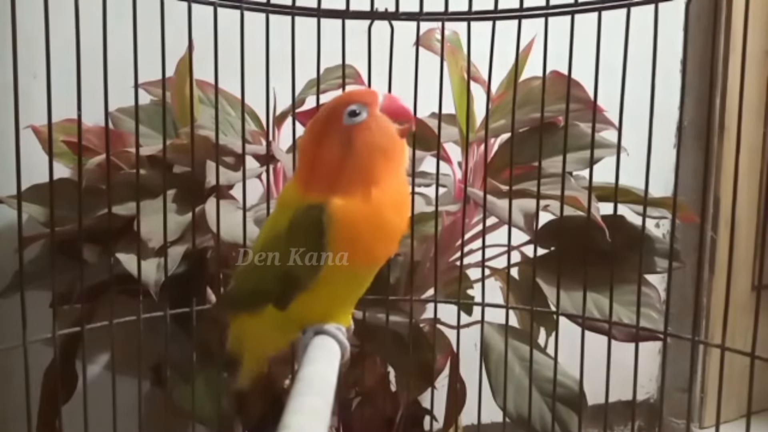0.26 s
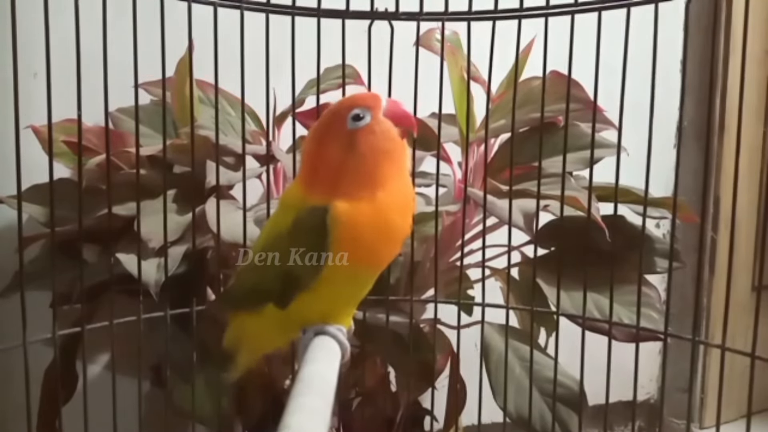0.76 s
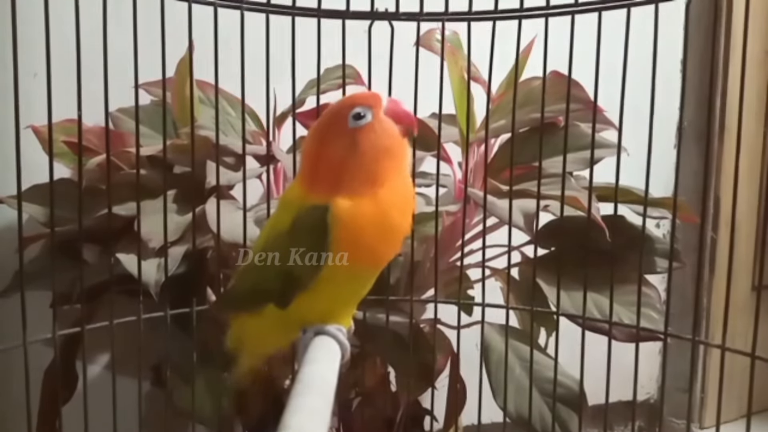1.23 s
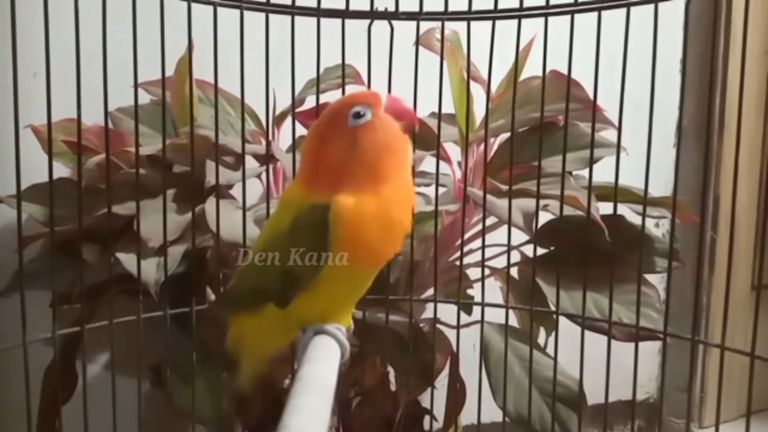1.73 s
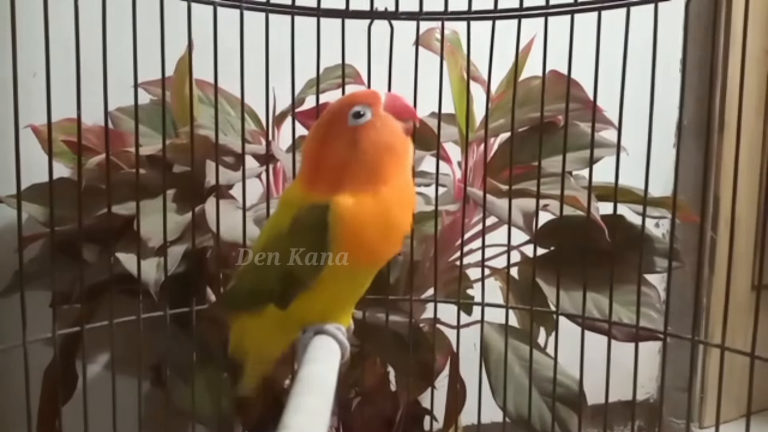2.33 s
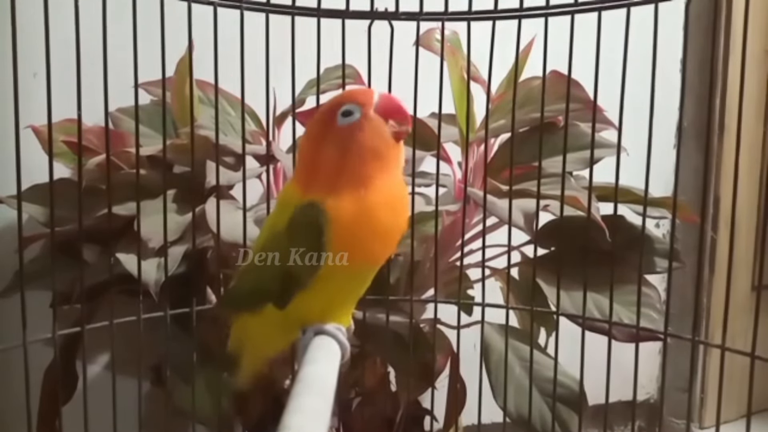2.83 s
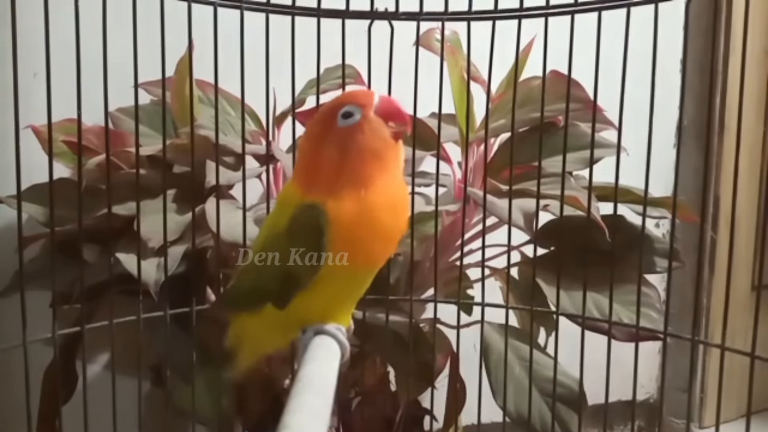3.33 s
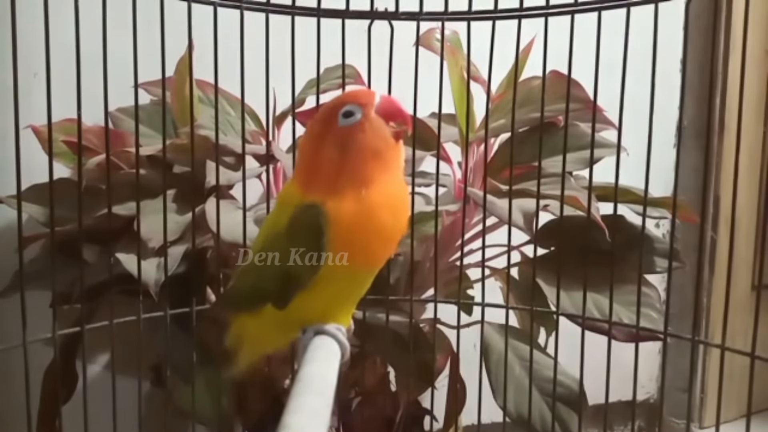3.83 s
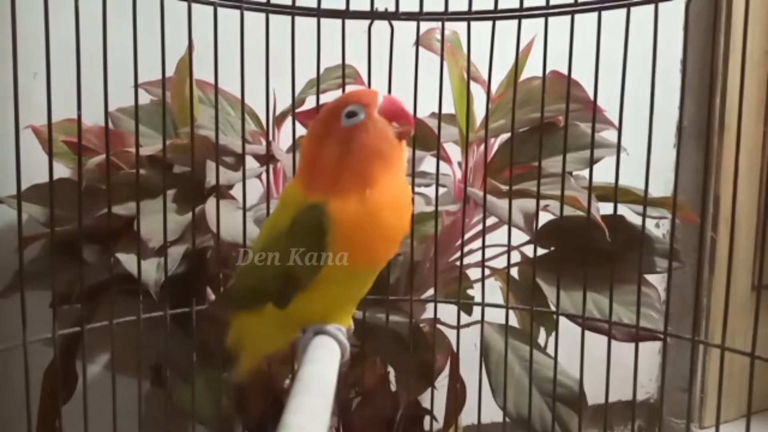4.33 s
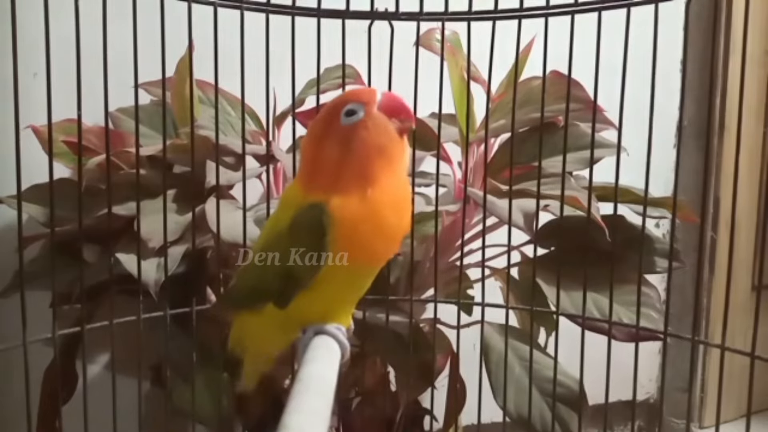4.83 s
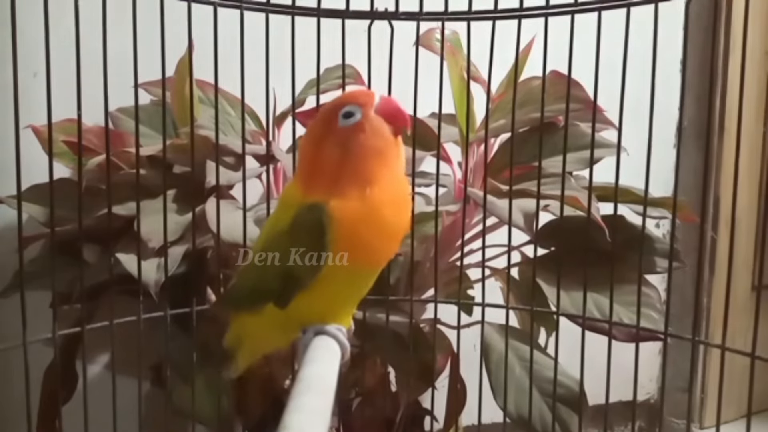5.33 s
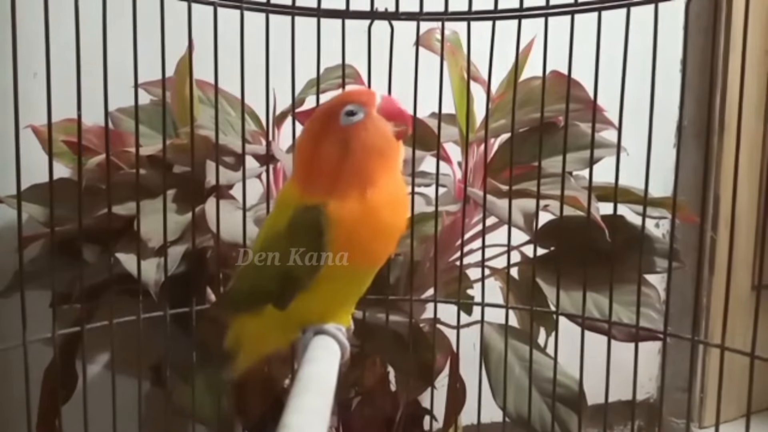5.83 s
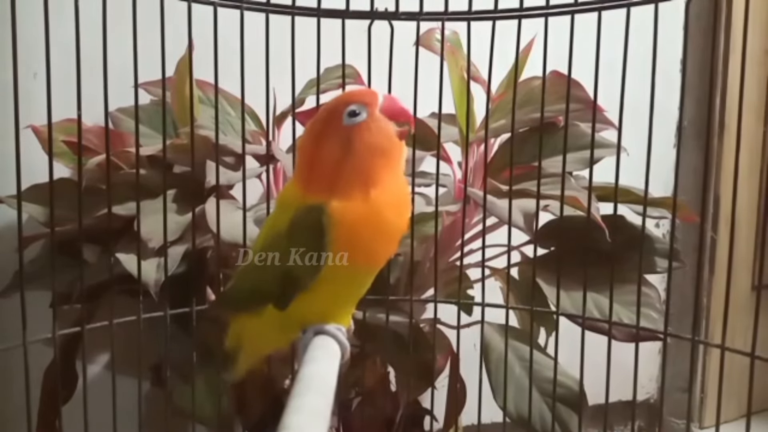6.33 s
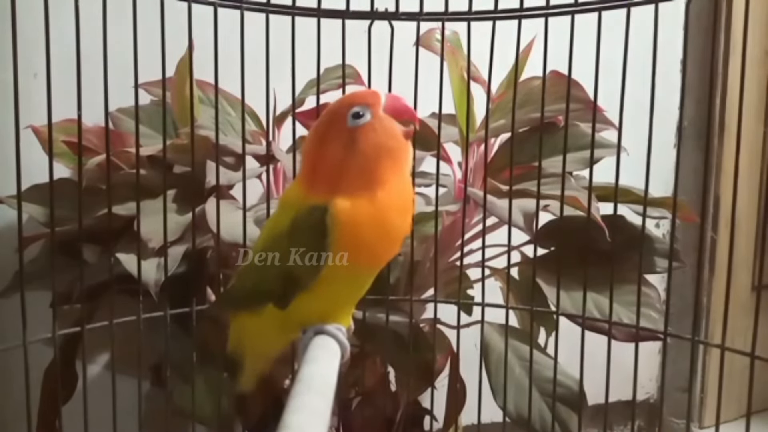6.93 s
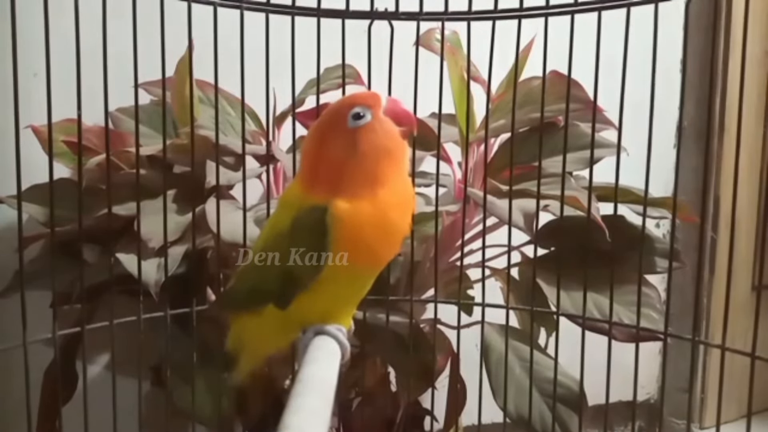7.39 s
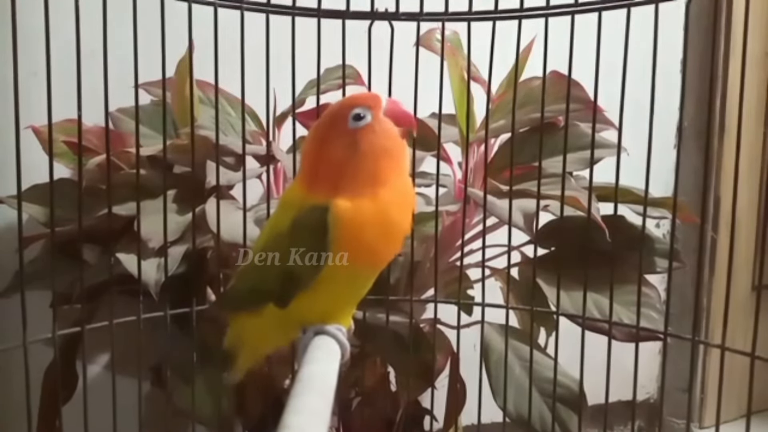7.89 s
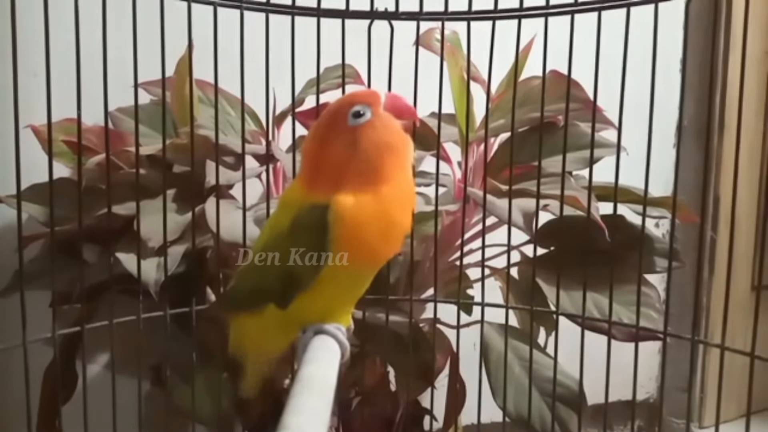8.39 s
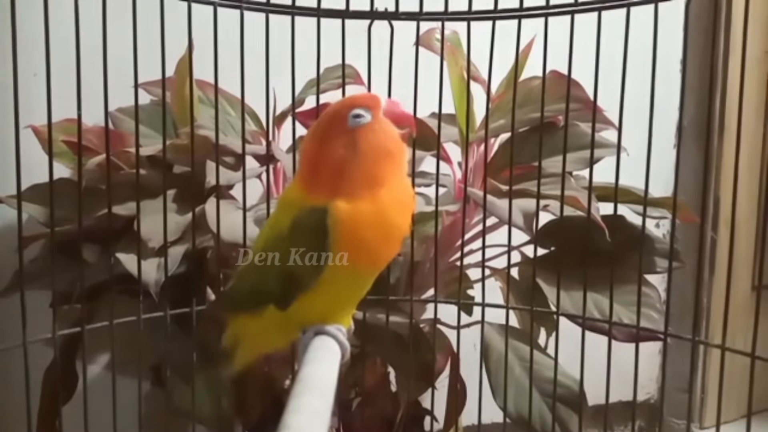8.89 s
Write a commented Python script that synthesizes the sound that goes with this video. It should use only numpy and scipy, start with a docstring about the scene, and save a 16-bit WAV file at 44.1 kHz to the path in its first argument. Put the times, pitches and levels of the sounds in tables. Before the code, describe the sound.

One lovebird calls close to the microphone in a small, hard, quiet room. Shrill chirps come evenly, about nine or ten a second, each with a quick upward flick and abrupt end. Dry chips thicken into fuller steps, then longer slurred chirps, before returning to chips; the cycle repeats. Bright echoes ring between them over faint air hush and low rumble.

```python
"""A caged lovebird chatters close by in a small, quiet room, about ten chirps each second.
Each chirp is a harmonic series on a gliding pitch, filtered by throat resonances: a lead-in, a sudden upward flick,
and a finish that settles and dies. The phrases pass from dry chips to drawn-out slurs; broadband noise rises and
falls with the chirps, and faint swept ticks precede them. Echoes and a decaying ring form the room's response.
Behind lie a faint wavering tone, filtered noise for still air, and a low rumble with soft thumps."""
import sys
import numpy as np
from scipy import signal
from scipy.fft import rfft, irfft
from scipy.io import wavfile
from scipy.ndimage import uniform_filter1d

SR = 44100
rng = np.random.default_rng(int(sys.argv[2]) if len(sys.argv) > 2 else 0)


def to_wav(sig):
    """Store sig (one row per channel, or 1-D mono) as 16-bit WAV at the path in sys.argv[1].

    Samples outside -1..1 are clipped; the rate is SR.
    """
    pcm = np.clip(np.atleast_2d(sig), -1, 1) * 32767
    pcm = np.round(pcm).astype(np.int16)
    wavfile.write(sys.argv[1], SR, pcm.T)  # frames by channels


N = 403515

# Lead-ins, each ending on top of the flick, before transposition and changes of effort:
# (share of the lead-in [0-1], pitch [Hz], relative level [dB], overtone tilt [dB per octave])
CHIP = [(0, 2332, -1.5, -1.5), (.3, 2615, -2.4, 6), (.53, 4082, -2, -0.5), (.8, 2695, -3, 5.5),
        (1, 4908, 1.5, -1.5)]
SOFT_CHIP = [(0, 2100, -6.5, 1.5), (.43, 2160, 0, 3.5), (.57, 3830, -5.5, -6.5), (.8, 2514, 0.5, -4),
             (1, 4440, -4.5, -14)]
STEP = [(0, 2510, -0.5, -4), (.4, 2580, -2, 2.5), (.75, 2815, -0.5, -6.5), (.9, 3060, -6.5, 6),
        (1, 5070, 1.5, -8.5)]
RISING_STEP = [(0, 2294, 5, 1.5), (.2, 2225, 1.5, -1), (.8, 2350, -2, 0.5), (1, 3740, 0, -2.5)]
LOW_STEP = [(0, 1537, -7, 1), (.42, 1960, 4.5, -2), (.9, 2030, -1, 4.5), (.96, 4300, -3, -6),
            (1, 4910, 8.5, -11.5)]
SCOOP = [(0, 1627, -14, -3), (.3, 1908, -2, -4), (.55, 2370, -4, -3), (.88, 2360, -5.5, 5.5),
         (1, 4730, 0, -12)]
ARCH = [(0, 1564, -10.5, 5.5), (.24, 1803, 0.5, -9.5), (.35, 3162, -6, -9.5), (.62, 3357, 1, -8),
        (.81, 3420, -1.5, -4), (.91, 2305, -1, -21.5), (1, 5170, -2.5, -26)]
FLAT_ARCH = [(0, 1533, -11, -1), (.24, 1680, -3.5, 0), (.35, 3297, -12.5, -2.5), (.79, 3510, -2, -4),
             (.88, 3690, -1, -21), (.92, 2510, -5.5, -7), (1, 3887, -4, 0)]
CLIMB = [(0, 1583, -9.5, 0), (.3, 1807, -3.5, -7.5), (.42, 3274, -7.5, -8), (.76, 3690, 2.5, -8.5),
         (.92, 4100, -7, -12), (1, 5360, -7.5, -10.5)]
FALL = [(0, 3975, -21, 3), (.24, 3634, 4, -5), (.5, 3046, -3.5, -1.5), (.75, 2660, 0.5, 3),
        (.94, 2160, -4.5, 7.5), (1, 4530, -3, -5)]
SQUEAK = [(0, 2580, 0.0035, 4.4), (1, 4140, 0, 1.3)]
# The bird's song, chirp by chirp:
# (start of the lead-in [s], gesture [name], lead-in [s], pitch factor [ratio], relative level [dB])
CHIRPS = [(.0058, "chip", .012, 0.98, -10.5), (.1077, "chip", 0.012, 0.96, -9.5),
          (0.2106, "chip", .0133, .98, -10), (0.311, "soft chip", .0135, .99, -9.5),
          (0.4167, "soft chip", 0.014, .965, -9), (0.5221, "soft chip", 0.011, 0.96, -8.5),
          (0.628, "soft chip", 0.014, 0.98, -9.5), (0.7342, "step", 0.01, 0.96, -10),
          (0.843, "step", 0.013, 0.99, -10), (0.957, "step", 0.013, 0.99, -9.5),
          (1.0707, "step", 0.014, 0.97, -9), (1.1857, "step", 0.016, 0.95, -8.5),
          (1.3019, "step", 0.018, 0.96, -8), (1.4175, "step", 0.018, 0.97, -6),
          (1.5394, "rising step", 0.02, 1.02, -8.5), (1.6537, "low step", 0.04, 0.97, -11),
          (1.773, "flat arch", 0.04, 1.016, -8), (1.8872, "arch", 0.036, 1.01, -10),
          (1.9979, "arch", .037, 1.007, -8.5), (2.1127, "arch", 0.039, 1, -9),
          (2.2287, "arch", 0.037, 0.99, -9), (2.3438, "arch", 0.039, 1.01, -10),
          (2.4602, "arch", 0.037, 1.013, -10), (2.594, "chip", 0.013, 0.88, -13),
          (2.6919, "chip", 0.011, 0.97, -10.5), (2.791, "chip", 0.011, 0.99, -10.5),
          (2.8945, "chip", 0.0094, .95, -11), (2.9951, "chip", 0.0096, 0.96, -12),
          (3.0412, "chip", 0.013, 1, -13.5), (3.098, "squeak", 0.0044, 0.77, -22.5),
          (3.1381, "chip", 0.011, 1.015, -11), (3.2373, "chip", 0.0097, .99, -10.5),
          (3.3351, "chip", 0.011, 0.98, -11), (3.4353, "chip", 0.0089, 0.97, -11),
          (3.5331, "chip", 0.0092, 1.005, -10), (3.6323, "chip", 0.01, 0.98, -11),
          (3.7349, "chip", 0.011, 0.98, -10.5), (3.8336, "chip", 0.01, 0.98, -10.5),
          (3.9296, "chip", 0.014, 0.98, -8.5), (4.0314, "chip", 0.013, 0.98, -9.5),
          (4.1302, "chip", .01, .98, -8.5), (4.2305, "chip", 0.012, 1.01, -9.5),
          (4.3356, "chip", 0.011, 0.98, -10), (4.4375, "chip", 0.011, .98, -9.5),
          (4.5395, "chip", 0.012, 0.95, -10), (4.6301, "fall", 0.038, 1.04, -11.5),
          (4.7385, "fall", 0.041, .99, -11.5), (4.8537, "scoop", .0306, 1.01, -9.5),
          (4.9639, "flat arch", 0.036, 1.005, -8), (5.0747, "climb", 0.039, .935, -10),
          (5.1886, "climb", 0.036, 1.023, -8), (5.2996, "climb", 0.03, 1.03, -8.5),
          (5.4064, "climb", 0.033, 1.026, -7.5), (5.5155, "climb", 0.035, 1.02, -9),
          (5.634, "chip", 0.012, 0.98, -11), (5.733, "chip", 0.012, 0.97, -10),
          (5.8315, "chip", 0.011, 0.99, -9.5), (5.9303, "chip", 0.013, 0.99, -11.5),
          (6.0314, "chip", 0.01, .965, -11.5), (6.1337, "chip", 0.011, 0.99, -10.5)]
SONG_S = 6.23093  # the song starts over after this time
ROUNDS = (0, SONG_S)  # starts of the two rounds [s]


def gain_of(db):
    """Logarithmic level: converts decibels to an amplitude ratio."""
    return 10 ** (np.asarray(db) / 20)


def evened(x):
    """Power normalization: scales a signal to an rms of 1."""
    return x / np.sqrt(np.mean(x ** 2) + 1e-20)


def read(points, hz, axis=1):
    """Spectral envelope: interpolates one column of a table along log frequency."""
    columns = np.transpose(points)
    return np.interp(np.log(hz + 1), np.log(columns[0] + 1), columns[axis])


def add(mix, s, sound):
    """Superposition: adds a sound into the mix, in place, from time s."""
    part = mix[max(round(s * SR), 0):][:len(sound)]
    part += sound[:len(part)]


def noise(spectrum):
    """Linear filtering: white noise is coloured by a spectral envelope."""
    white = rfft(rng.standard_normal(N))
    hz = np.fft.rfftfreq(N, 1 / SR)
    return irfft(white * gain_of(read(spectrum, hz)), N)


def waver(size, hz):
    """Random modulation: noise of rms 1 under a Gaussian low-pass, down to 1/e at hz."""
    white = rfft(rng.standard_normal(size))
    lowpass = np.exp(-(np.fft.rfftfreq(size, 1 / SR) / hz) ** 2)
    return evened(irfft(white * lowpass, size))


def gesture(name, lead):
    """Exponential relaxation: after the stretched lead-in, pitch, level and tilt settle to the finish."""
    # Gestures by name: (lead-in [table], hold [s], resting pitch [Hz], slide [Hz per s],
    # relative level [dB], droop [dB per s], overtone tilt [dB per octave])
    repertoire = {"chip": (CHIP, 0.016, 4230, -1800, -1.66, 460, 2.87),
                  "soft chip": (SOFT_CHIP, 0.017, 3920, -5000, 0.73, 190, -1.8),
                  "step": (STEP, .018, 4480, -9500, 2.2, 430, -3),
                  "rising step": (RISING_STEP, 0.027, 3760, 25200, 0.56, 120, -3.8),
                  "low step": (LOW_STEP, .012, 5050, -52000, 4.1, 530, -2.3),
                  "scoop": (SCOOP, 0.012, 4850, -45000, 4, 800, 0),
                  "arch": (ARCH, 0.01, 3760, -6000, 0, 200, -1.1),
                  "flat arch": (FLAT_ARCH, 0.0085, 3660, -1000, -1, 340, -1.7),
                  "climb": (CLIMB, 0.0083, 4400, -10000, 0, 250, -2.8),
                  "fall": (FALL, .011, 4230, -5000, 0, 590, 2.6),
                  "squeak": (SQUEAK, .001, 5500, -3000, -11, 500, 2)}
    settle_s, release_s, release_db = 0.00255, 0.01, -36
    lead_in, hold, rest_hz, slide, finish_db, droop, finish_tilt = repertoire[name]
    share, *controls = np.transpose(lead_in)
    t = np.arange(-lead, hold + release_s, 1 / SR)  # zero at the flick
    after = np.maximum(t, 0)
    settled = 1 - np.exp(-after / settle_s)
    finish = (rest_hz + slide * after, finish_db - droop * after, finish_tilt)
    hz, db, tilt = [(1 - settled) * np.interp(1 + t / lead, share, early) + settled * late
                    for early, late in zip(controls, finish)]
    release = release_db * np.maximum(t - hold, 0) / release_s
    return t, hz, db + release, tilt


def chirp(row, jitter=0.0033, flick_jitter=0.021, flick_s=0.013, shimmer_db=1.0, edge_s=0.00136,
          stray=0.019, accent_db=1.32):
    """Source and filter: the syrinx's gliding partials sweep through the throat's resonances."""
    # Partials of the syrinx: (multiple of the pitch [ratio], relative level [dB])
    partials = [(1, 0), (2, -6.5), (3, -17.5), (4, -20.5), (5, -25.5), (6, -44)]
    # Resonances of throat and open beak: (frequency [Hz], gain [dB])
    throat = [(1600, -16.5), (2200, -10.5), (3000, 0), (4000, -0.5), (5000, -5), (6000, -2.5), (7000, 0.5),
              (8000, 3), (9000, -9.5), (10500, -1), (12200, -4), (13500, 2), (15500, -24)]
    usual_db = -10
    rounding = 0.42  # overtone tilt lost per dB of effort [dB per octave]
    lead_dip = 0.0072  # share of the lead-in's pitch lost per dB of effort

    start, name, lead, transpose, level_db = row
    t, hz, db, press = gesture(name, lead)
    before_flick = t < 0
    shimmer = shimmer_db * waver(size=4096, hz=602)[:len(t)]
    onset = np.clip((t + lead) / edge_s, 0, 1)
    level = gain_of(level_db + db + shimmer) * onset

    # The membranes shake most around the flick
    shake_depth = jitter + flick_jitter * np.exp(-(t / flick_s) ** 2)
    shake = shake_depth * waver(size=4096, hz=880)[:len(t)]
    # No two lead-ins are quite alike in pitch and accent
    shake += stray * waver(size=4096, hz=119.9)[:len(t)] * before_flick
    level *= gain_of(accent_db * waver(size=4096, hz=119.4)[:len(t)] * before_flick)

    # Louder chirps are rounder and lead in from lower down
    effort = max(level_db - usual_db, -2)
    pitch = transpose * hz * (1 + shake) * (1 - lead_dip * effort * before_flick)
    phase = 2 * np.pi * np.cumsum(pitch) / SR
    # Pressed harder, the membranes snap shut and the overtones grow
    tilt_db = press - rounding * effort
    tone = np.zeros(len(t))
    for k, (_, partial_db) in enumerate(partials, 1):
        audible = np.clip((SR / 2 - k * pitch) / 4000, 0, 1)  # fades out towards half the sample rate
        overtone_db = partial_db + tilt_db * np.log2(k) + read(throat, k * pitch)
        tone += audible * gain_of(overtone_db) * np.sin(k * phase)
    return start, level * tone


def voice(chirp_noise_db=-2):
    """Amplitude modulation: broadband noise rises and falls with the slope of the chirps' waveform."""
    # Spectrum of the noise under the chirps: (frequency [Hz], relative level [dB])
    chirp_noise = [(60, -28.5), (200, -22), (400, -26), (900, -25), (1500, -29), (2500, -28), (4500, -12),
                   (8000, -27), (11000, -25), (16000, -21)]
    song = np.zeros(N)
    for offset in ROUNDS:
        for row in CHIRPS:
            start, sound = chirp(row)
            add(song, offset + start, sound)
    slope = np.diff(song, prepend=0)
    sharpness = np.sqrt(abs(uniform_filter1d(slope ** 2, size=64)))
    return song + gain_of(chirp_noise_db) * sharpness * noise(chirp_noise)


def ticks(ahead_s=0.018, hz=1480, glide=0.28, length_s=0.00365, level_db=-48, spread_db=2.0, brief_s=0.014):
    """Frequency sweep: a windowed rising sine ahead of each chirp, closer to those with a long lead-in."""
    out = np.zeros(N)
    t = np.arange(0, length_s, 1 / SR)
    for offset in ROUNDS:
        for start, _, lead, *_ in CHIRPS:
            size, pitch, late = rng.standard_normal(3)
            sweep = hz * (1 + .08 * pitch) * (1 + glide * (2 * t / length_s - 1))
            tick = np.hanning(len(t)) * np.sin(2 * np.pi * np.cumsum(sweep) / SR)
            ahead = ahead_s * min(1, brief_s / lead)
            s = offset + start - ahead - length_s / 2 + 0.00087 * late
            add(out, s, gain_of(level_db + spread_db * size) * tick)
    return out


def room(x, first_s=0.0047, wall_s=0.05, wall_width_s=0.0076, wall_db=4):
    """Reverberation: convolution with near echoes and a diffuse ring that swells as the far wall answers."""
    # Diffuse ring: (frequency [Hz], relative level [dB], 60 dB decay time [s])
    ring = [(200, -42, 0.53), (1810, -8, 1), (3220, -12.5, 0.99), (4770, -12, 0.67), (8700, -8, 0.64),
            (11600, -16, 0.41), (16000, -7, 0.23)]
    # Echoes from near surfaces: (delay [s], gain [amplitude ratio])
    reflections = [(.0012, 0.1), (.0017, 0.18), (.0026, 0.066), (.0057, 0.094), (.0094, 0.2),
                   (0.0095, 0.044), (0.0108, 0.16), (0.0153, 0.21)]
    sparse = rng.standard_normal(SR) * (rng.random(SR) < .15)
    taps = sparse * (np.arange(SR) > first_s * SR)
    hz, t, bands = signal.stft(evened(taps), SR, nperseg=256)
    t60 = read(ring, hz, axis=2)[:, None]
    wall_swell = gain_of(wall_db * np.exp(-((t - wall_s) / wall_width_s) ** 2))
    decay = wall_swell * np.exp(-np.log(1000) * t / t60)
    # Each band is evened in power before it takes its level
    decay *= gain_of(read(ring, hz))[:, None] / np.sqrt(SR * np.mean(decay ** 2, axis=1, keepdims=True))
    response = signal.istft(bands * decay, SR, nperseg=256)[1]
    response[0] += 1  # direct sound
    for delay, gain in reflections:
        response[round(delay * SR)] += gain
    return signal.fftconvolve(x, response)[:N]


def far_tone(blur=0.0632):
    """Random frequency and amplitude modulation: distance blurs a tone to a narrow, wavering band."""
    # Contour of the faint, drawn-out tone: (time in the round [s], pitch [Hz], level [dB])
    contour = [(.8, 660, -78), (1.0, 703, -72), (1.25, 720, -67), (1.5, 708, -63), (1.7, 720, -66),
               (1.85, 715, -71), (2.05, 620, -76), (2.3, 534, -81)]
    s, hz, db = np.transpose(contour)
    t = np.arange(s[0], s[-1], 1 / SR)
    pitch = np.interp(t, s, hz) * (1 + blur * waver(len(t), hz=40.6))
    level = gain_of(np.interp(t, s, db)) * waver(len(t), hz=16.14)
    tone = level * np.sin(2 * np.pi * np.cumsum(pitch) / SR)
    out = np.zeros(N)
    for offset in ROUNDS:
        add(out, offset + s[0], tone)
    return out


def rumble(level_db=-70.5, swell_at_s=1.7, swell_width_s=.5, swell_db=3.5, waver_db=1.0,
           thump_db=-8, thump_s=0.007):
    """Amplitude modulation: low noise swells once a round; brief rises in its level make soft thumps."""
    # Rumble spectrum: (frequency [Hz], relative density [dB per Hz])
    low_spectrum = [(25, -22), (60, -13), (140, -6.5), (220, -11.5), (400, -12), (1000, -54), (16000, -70)]
    # Thumps, some of them under chirps: (time [s], level before thump_db [dB])
    thumps = [(3.737, -51), (3.932, -51), (4.234, -46), (4.336, -48), (4.441, -45), (4.636, -54),
              (4.988, -64), (7.309, -54.5)]
    t = np.arange(N) / SR
    swell = np.exp(-((t % SONG_S - swell_at_s) / swell_width_s) ** 2)
    level = gain_of(level_db + swell_db * swell + waver_db * waver(N, hz=12))
    age = t[:SR // 4] / thump_s
    for s, db in thumps:
        add(level, s, gain_of(db + thump_db) * age * np.exp(1 - age))
    return level * evened(noise(low_spectrum))


def still_air(level_db=-53):
    """Stationary noise: the room's still air is a steady, faint hush of fixed spectrum."""
    # Hush spectrum: (frequency [Hz], relative density [dB per Hz])
    hush_spectrum = [(25, -27), (60, -13), (140, -4), (300, -9.5), (500, -14), (720, -8.5), (1000, -16),
                     (3000, -3), (16000, -11.5)]
    return gain_of(level_db) * evened(noise(hush_spectrum))


def scene(bird_db=-0.45):
    """Superposition: the bird and ticks excite the room; the background is added without reverberation."""
    bird = gain_of(bird_db) * voice() + ticks()
    return (room(bird) + far_tone() + rumble() + still_air())[None]


def record(dry):
    """Band limitation: the recorder's symmetric low-pass cuts off around 15.7 kHz."""
    lowpass = signal.firwin(401, 15700, window=("kaiser", 8), fs=SR)
    return signal.oaconvolve(dry, lowpass[None], "same", axes=1)


dry = scene()
out = record(dry)
to_wav(out)
```